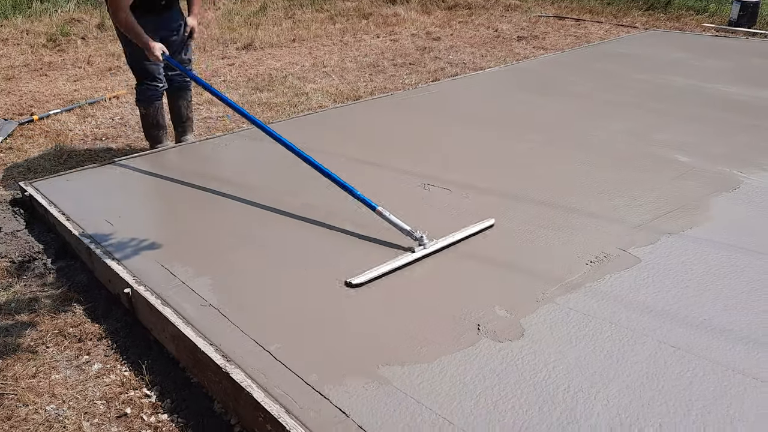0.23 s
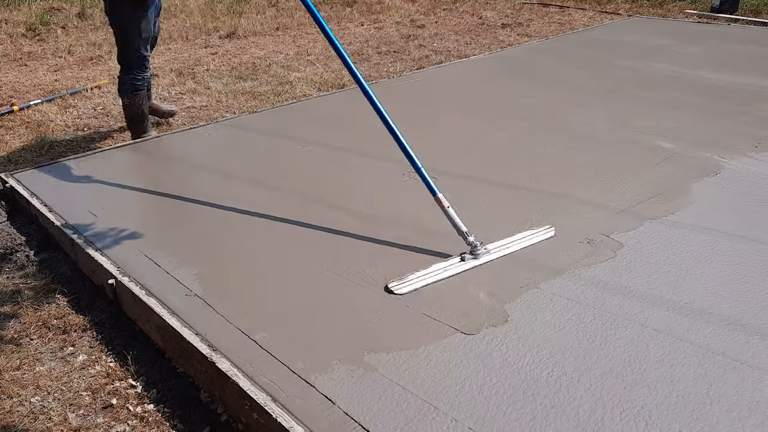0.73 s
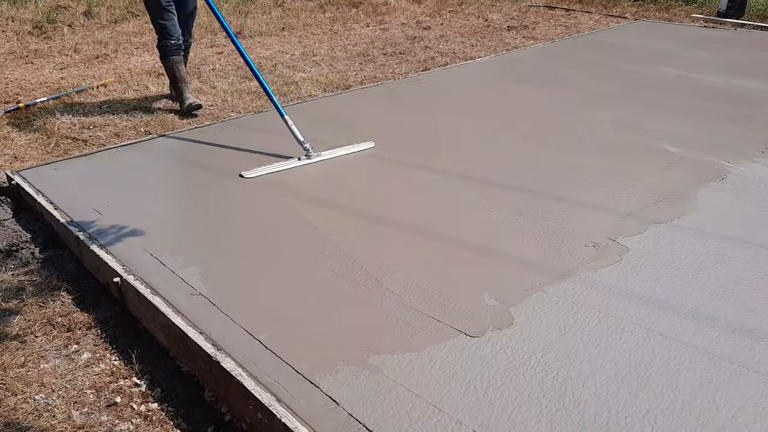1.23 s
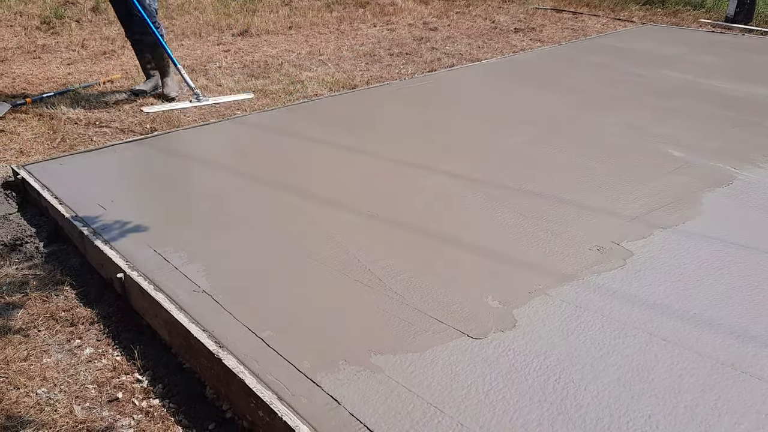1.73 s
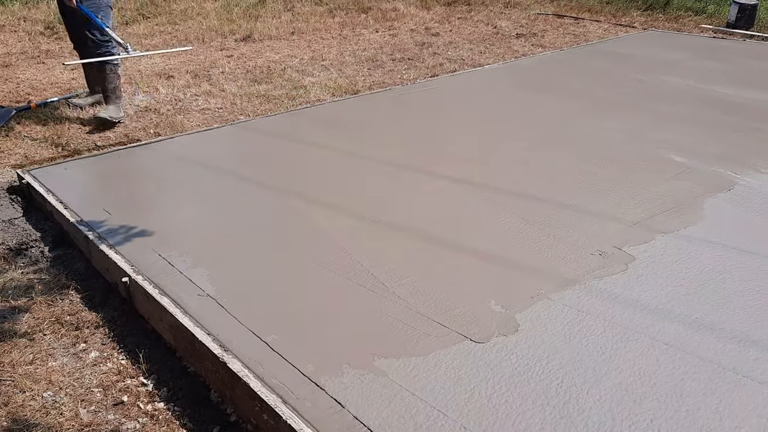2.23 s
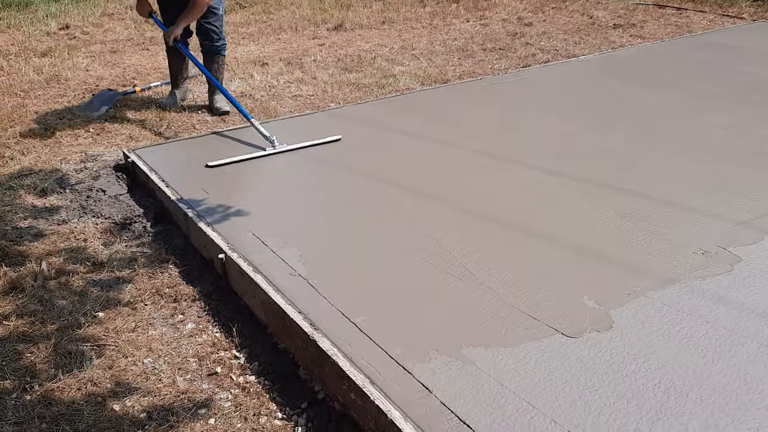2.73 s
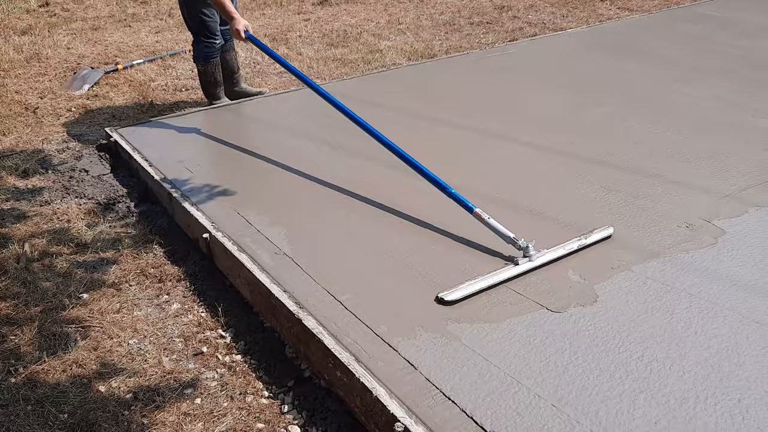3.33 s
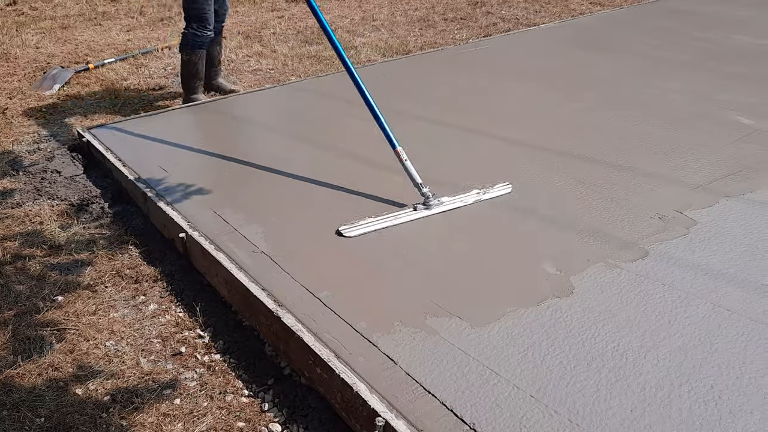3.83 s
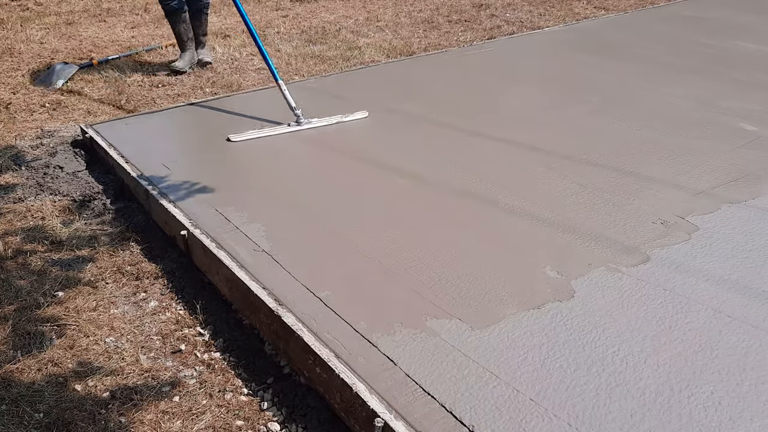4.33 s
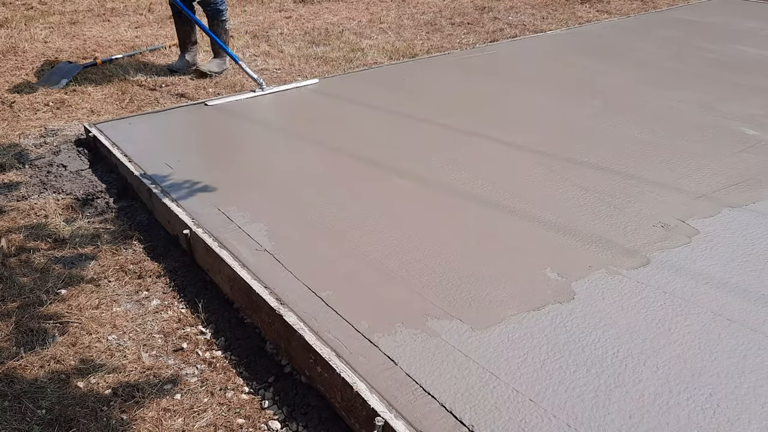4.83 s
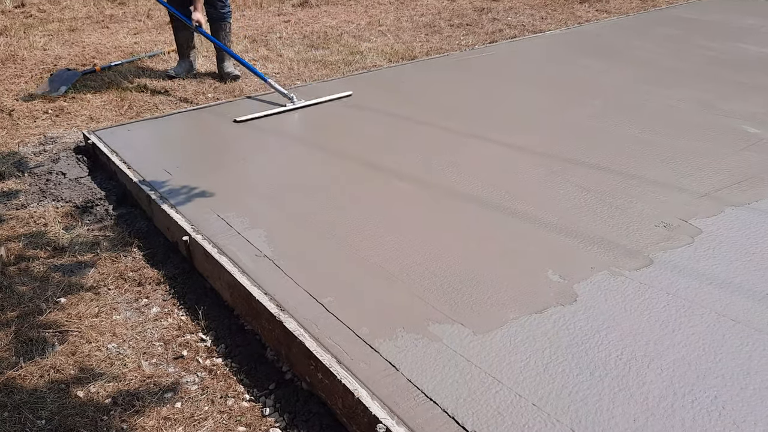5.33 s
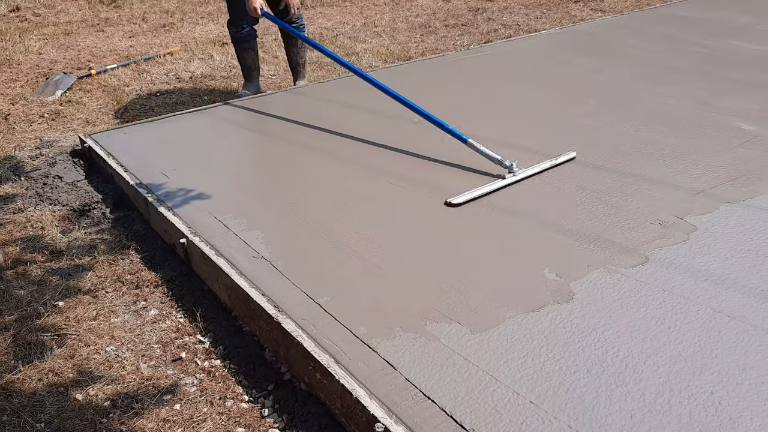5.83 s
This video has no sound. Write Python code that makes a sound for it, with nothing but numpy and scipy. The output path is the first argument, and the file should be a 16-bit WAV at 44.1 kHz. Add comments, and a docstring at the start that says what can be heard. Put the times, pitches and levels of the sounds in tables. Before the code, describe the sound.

A gritty metallic sweep over wet paste opens the scene, followed by a faint trailing scrape, a few ticks and a pause. A second, longer push builds and stops, the blade slides back, then a third push ends it. Open-air hiss and fine insect sizzle continue throughout. Low wind puffs hit the stereo microphone early, and a stronger gust arrives later on the right along with a brighter hiss.

```python
"""A metal bull float is pushed out over wet concrete at 0, 2.7 and 5.3 s: sand grains tick and ring
the blade, paste swishes and a water film hisses. Each is shaped noise, and so is the outdoor hiss.
Insects sizzle and wind rumbles throughout; eddies thump on the microphone ports as short low tones.
Between pushes the blade drags lightly back, twice, with scuffs and knocks made of short noise bursts.
One insect buzzes lower near 2.5 s; a brighter hiss sets in at 4.6 s, mostly on the right."""
import sys
import numpy as np
from scipy import signal
from scipy.fft import rfft, irfft, next_fast_len
from scipy.io import wavfile
from scipy.ndimage import uniform_filter1d, map_coordinates

SR = 44100
rng = np.random.default_rng(int(sys.argv[2]) if len(sys.argv) > 2 else 0)


def store_wav(level_fs):
    """Save 16-bit WAV to argv[1]."""
    pcm = np.round(np.clip(np.atleast_2d(level_fs), -1, 1) * 32767)
    wavfile.write(sys.argv[1], SR, pcm.T.astype(np.int16))


N = 268833  # length in samples, about 6.1 s


def amp(db):
    """Turn decibels into a gain."""
    return 10 ** (np.asarray(db) / 20)


def unit(x):
    """Scale to an average strength (rms) of 1."""
    return x / np.sqrt(np.mean(x ** 2) + 1e-20)


def seconds():
    """The time of every sample, in seconds."""
    return np.arange(N) / SR


def since(start):
    """Seconds since start, zero before it."""
    return np.maximum(seconds() - start, 0)


def held(start, end, attack, release):
    """Gain that rises until start, holds to end, then falls; attack and release are seconds per 20 dB."""
    t = seconds()
    before = np.maximum(start - t, 0)
    after = np.maximum(t - end, 0)
    return amp(-20 * (before / attack + after / release))


def approach(full, grows_db):
    """Gain that climbs by grows_db a second until the time full, as the blade comes nearer."""
    return amp(-grows_db * np.maximum(full - seconds(), 0))


def swells(rows):
    """Gain of bell-shaped swells (t/s, rise/s, fall/s, level/dB) whose powers add."""
    t = seconds()
    power = np.zeros(N)
    for peak, rise, fall, db in rows:
        distance = (t - peak) / np.where(t < peak, rise, fall)
        power += amp(db) ** 2 * np.exp(-np.minimum(distance ** 2, 100))
    return np.sqrt(power)


def wobble(rate):
    """A smooth curve through random points, rate points a second."""
    points = rng.standard_normal(int(N * rate / SR) + 4)
    return map_coordinates(points, [np.arange(N) * rate / SR])


def noise(alike=0):
    """White stereo noise whose sides share a part (alike) of their power."""
    own = rng.standard_normal((2, N))
    common = rng.standard_normal(N)
    return np.sqrt(1 - alike) * own + np.sqrt(alike) * common


def panned(x, right_db):
    """Lean a stereo sound to the right."""
    return x * amp([[-right_db / 2], [right_db / 2]])


def filtered(x, response):
    """Multiply the spectrum of x by a response of frequency."""
    size = x.shape[-1]
    m = next_fast_len(size + 8192)  # room for the filter's tail
    hz = np.fft.rfftfreq(m, 1 / SR)
    return irfft(rfft(x, m) * response(hz), m)[..., :size]


def coloured(x, spectrum, peaks=()):
    """Shape x by a spectrum (f/Hz, level/dB) and resonances (f/Hz, width/Hz, lift/dB), then set rms 1."""
    f, db = np.transpose(spectrum)

    def response(hz):
        level_db = np.interp(np.log(hz + 1), np.log(f), db)
        for centre, width, lift in peaks:
            level_db = level_db + lift / (1 + (2 * (hz - centre) / width) ** 2)
        return amp(level_db)

    return unit(filtered(x, response))


def patchy(x, depth_db):
    """Narrow bands of x swell and fade on their own."""
    bands = signal.stft(x, nperseg=1024)[2]
    field = rng.standard_normal(bands.shape[1:])
    field = uniform_filter1d(field, size=4, axis=0)  # smooth across pitch
    field = uniform_filter1d(field, size=6, axis=1)  # smooth across time
    return signal.istft(bands * amp(depth_db * unit(field)), nperseg=1024)[1][:, :N]


def grit(rate, size_db, share):
    """Ticks of very unequal size, rate a second, hold a share of the power; smooth noise holds the rest."""
    sizes = amp(size_db * np.minimum(rng.exponential(size=N), 4))
    hits = (rng.random(N) < rate / SR) * sizes
    burst = np.exp(-np.arange(SR // 200) / (SR * 0.0006))  # each tick's power dies in 0.6 ms
    power = np.abs(signal.fftconvolve(hits ** 2, burst)[:N])
    return noise(alike=0.096) * np.sqrt(1 - share + share * power / power.mean())


def pushes():
    """The blade rides out on the paste: sand rasps and rings it, paste swishes, a thin film hisses."""
    # forward strokes: set down t/s, full weight t/s, full ringing t/s, stop t/s, rasp level/dB,
    # rasp easing after full weight/(dB per s), paste level/dB, ring level/dB (rasp, paste boosted below)
    strokes = [(0, 0.337, 0.35, 0.53, -50.5, 20, -74.5, -46.5),
               (2.678, 3.19, 3.41, 3.47, -50, -4, -61, -47), (5.29, 5.655, 5.86, 6.05, -53, 3.5, -57, -49)]
    # wet patches that spray: t/s, rise/s, fall/s, level/dB (boosted below with the film)
    splashes = [(.172, 0.022, 0.015, -50.5), (.29, 0.062, 0.064, -53.5), (2.8, 0.067, 0.062, -52.5),
                (3.28, .13, .2, -55.5), (5.36, 0.026, 0.027, -58), (5.67, 0.066, .1, -48.5)]
    # colours of rasp, ringing, paste and spray: f/Hz, relative level/dB
    rasp_colour = [(250, -47), (680, -14), (900, -6.5), (1150, -1.5), (1450, -2), (2200, 2), (2700, -1),
                   (3300, -1), (4300, -3.5), (5300, -5), (7000, -14), (9000, -27), (16000, -37)]
    ring_colour = [(900, -27), (1170, -9), (1320, -27), (1520, -5), (1750, -18), (1980, -2), (2120, 0),
                   (2300, -0.5), (2500, -10), (3200, -9.5), (3900, -9.5), (4500, -18), (4900, -20),
                   (6000, -48)]
    paste_colour = [(60, -16), (130, -7), (230, -3.5), (330, -2.5), (420, -4.5), (600, 0.5), (720, -4.5),
                    (900, 0), (1300, -15.5), (2000, -18), (5000, -39)]
    spray_colour = [(2000, -16), (4000, 6.5), (5500, -0.5), (7300, 1), (8300, -5), (9300, -16),
                    (11500, -13), (20000, -28)]
    # resonances of the blade: f/Hz, width/Hz, lift over the rasp/dB
    blade = [(1150, 150, 1.5), (1600, 360, -3.5), (4600, 910, 5.5)]
    attack_s = 0.083  # the blade settles on the paste
    rasp_release_s, ring_release_s = 0.069, 0.094  # the blade slows and stops
    paste_release_s = 0.22  # the paste flows on a little

    rasp, paste, ringing = np.zeros((3, N))
    for start, full, rings, stop, rasp_db, easing_db, paste_db, ring_db in strokes:
        rasp_level = amp(rasp_db - easing_db * since(full)) * approach(full, grows_db=26.5)
        paste_level = amp(paste_db) * approach(full, grows_db=49)
        ring_level = amp(ring_db) * approach(rings, grows_db=57)
        rasp += rasp_level * held(start, stop, attack_s, rasp_release_s)
        paste += paste_level * held(start, stop, attack_s, paste_release_s)
        ringing += ring_level * held(start, stop, attack_s, ring_release_s)
    # the film follows the rasp's level, and the splashes add to it
    spray = np.hypot(amp(-10.5) * rasp, swells(splashes))

    grains = patchy(grit(rate=2000, size_db=7.5, share=0.32), depth_db=2.5)
    sand = rasp * amp(5) * coloured(grains, rasp_colour, blade)
    ringing_grains = patchy(grit(rate=810, size_db=5, share=0.27), depth_db=4)
    ring = ringing * coloured(ringing_grains, ring_colour)
    swish = paste * amp(3.5) * coloured(noise(alike=0.33), paste_colour)
    droplets = grit(rate=2500, size_db=5, share=0.35)
    film = spray * amp(3.5) * coloured(droplets, spray_colour)
    judder = amp(1.3 * wobble(35))  # the blade catches and frees itself
    return judder * (sand + panned(ring, right_db=-1.5) + swish + panned(film, right_db=3))


def outdoors():
    """Leaves hiss in the breeze over a far roar; a brighter hiss sets in, mostly on the right."""
    # level of the leaves: t/s, level/dB
    breeze_levels = [(0, -51), (.68, -54), (1.1, -51.5), (1.92, -53.5), (2.3, -51.5), (3.6, -52.5),
                     (4.1, -51.5), (6.1, -50)]
    # swells of a far, soft roar: t/s, rise/s, fall/s, level/dB
    far_swells = [(1.45, .4, 0.33, -65.5), (2.15, 0.21, 0.2, -66), (3.8, 0.44, .6, -64),
                  (5.4, 0.61, .45, -54)]
    # bright hiss at the left, then the right port: level/dB, fading/(dB per s)
    hiss_levels = [(-54, 6), (-45.5, 0.5)]
    # colours of leaves, roar and bright hiss: f/Hz, relative level/dB
    air_colour = [(100, -14), (240, -10), (310, -6), (420, -7.5), (620, -9), (860, -6.5), (1150, -14.5),
                  (1900, -15.5), (2600, -9), (3600, -3), (5000, -0.5), (6100, -4.5), (7400, -5),
                  (9200, -20.5), (11000, -16.5), (20000, -7.5)]
    roar_colour = [(200, -51), (430, -10.5), (590, 1.5), (720, -1), (880, 4), (1100, -1.5), (1400, -2),
                   (2000, -16), (4000, -79)]
    bright_colour = [(1500, -17.5), (2800, -15), (3800, -4), (4600, -0.5), (5250, 4.5), (5600, -1.5),
                     (7000, -3), (8000, -9.5), (9200, -26), (12000, -30), (20000, -32)]
    hiss_start_s, hiss_attack_s = 4.58, 0.03

    breeze = amp(np.interp(seconds(), *np.transpose(breeze_levels)))
    leaves = breeze * coloured(patchy(noise(), depth_db=2.5), air_colour)
    roar = swells(far_swells) * coloured(patchy(noise(), depth_db=1.5), roar_colour)
    fading = np.array([amp(db - fade_db * since(hiss_start_s)) for db, fade_db in hiss_levels])
    onset = held(hiss_start_s, N / SR, hiss_attack_s, 1)
    hiss = onset * fading * coloured(noise(), bright_colour)
    return panned(leaves, right_db=1.5) + roar + hiss


def insects():
    """Insects sizzle in swells of high noise in the grass; one buzzes in a lower band for a moment."""
    # swells of the sizzle: t/s, rise/s, fall/s, level/dB
    sizzling = [(.25, .4, 0.4, -60.5), (1.1, 0.21, .23, -57), (2.31, 0.11, 0.11, -59),
                (2.75, 0.19, .15, -56), (3.04, .15, 0.15, -54), (4.02, .09, 0.21, -57),
                (4.3, .15, 0.14, -67), (4.75, 0.15, 0.23, -54.5), (5.14, .22, .06, -53.5),
                (5.6, 0.42, .3, -58)]
    # the one buzz: start t/s, end t/s, attack/s, release/s, level/dB
    start, end, attack, release, buzz_db = (2.3, 2.77, .3, .12, -60)
    # colours of sizzle and buzz: f/Hz, relative level/dB
    sizzle_colour = [(9000, -35), (11300, -12), (12600, -1), (14500, 0), (16000, -5)]
    buzz_colour = [(6000, -47), (7200, -20), (7450, 1), (7800, -5), (8150, -14), (9000, -54)]

    chorus = np.hypot(amp(-67.5), swells(sizzling))  # a soft bed remains between swells
    sizzle = chorus * amp(1.1 * wobble(40)) * coloured(noise(), sizzle_colour)
    buzz_level = held(start, end, attack, release) * amp(buzz_db + 1.1 * wobble(70))
    buzz = buzz_level * coloured(patchy(noise(), depth_db=1), buzz_colour)
    return panned(sizzle + buzz, right_db=2)


def wind():
    """Gusts rumble at each port; single eddies thump against them with a hollow puff."""
    # gusts: start t/s, end t/s, release/s, rumble level/dB (boosted below), hollow murmur level/dB
    gusts = [(0.06, .5, 0.31, -54.5, -63), (0.86, 1.2, 0.79, -61, -74), (3.155, 3.41, 0.089, -63, -76),
             (4.015, 4.5, .2, -64.5, -78.5), (4.591, 4.832, 0.45, -44.5, -63), (5.27, 6.1, .3, -57, -63)]
    # single eddies: t/s, left level/dB, right level/dB, f/Hz, length/s,
    # hollow puff over the thump/dB (lowered below)
    buffets = [(.173, -43, -46, 81, .018, -3), (0.596, -39, -41.5, 80, 0.016, -6.5),
               (0.656, -41, -54, 72, 0.038, -10), (0.823, -33.5, -35, 101, .014, -8.5),
               (0.949, -48, -50, 105, 0.0088, -2), (1.032, -40.5, -42, 88, .0084, -11),
               (1.177, -47, -51, 72, 0.018, -12), (1.295, -49, -51, 110, 0.0061, .5),
               (3.283, -52, -51, 100, .012, -15), (3.384, -51, -50, 95, .025, -15),
               (4.602, -42, -34, 75, 0.03, -29), (4.667, -55, -29.5, 68, 0.024, -18),
               (4.747, -53, -26, 99, 0.0095, -25), (4.78, -46, -30, 72, .022, -22),
               (4.83, -51, -32.5, 65, 0.018, -18), (4.901, -50, -30, 66, 0.014, -16),
               (4.949, -44, -31.5, 60, 0.015, -21), (5.036, -54, -37.5, 76, 0.014, -17),
               (5.155, -55, -34.5, 61, .007, -16.5), (5.55, -68, -39, 64, 0.022, -12)]
    # colours of the rumble and of the ports' hollow: f/Hz, relative level/dB
    rumble_colour = [(15, -49), (30, -15), (45, -6.5), (62, -1), (90, -1), (125, -1.5), (170, -10),
                     (240, -20), (330, -21.5), (480, -64), (1200, -68)]
    port_colour = [(60, -10), (140, 8), (235, -2), (320, 3), (420, -12), (650, -19), (1500, -60)]

    rumble = np.full(N, amp(-67.5))  # a faint rumble stays between gusts
    hollow = np.zeros(N)
    for start, end, release, rumble_db, hollow_db in gusts:
        gust = held(start, end, 0.09, release)
        rumble = np.hypot(rumble, amp(rumble_db) * gust)
        hollow = np.hypot(hollow, amp(hollow_db) * gust)
    lumps = unit(amp(3.7 * np.array([wobble(26), wobble(26)])))  # uneven at each port on its own
    flow = rumble * amp(2) * coloured(noise(alike=0.15), rumble_colour)
    flutter = unit(amp(3.2 * wobble(20)))
    murmur = hollow * flutter * panned(coloured(noise(), port_colour), right_db=4)
    out = lumps * (flow + murmur)

    puff = panned(coloured(noise(), port_colour), right_db=6.5)
    t = seconds()
    for s, left_db, right_db, hz, length, puff_db in buffets:
        near = np.abs(t - s) < 4 * length
        u = t[near] - s
        turn = rng.random()
        port_turns = rng.random((2, 1))
        swing = np.sin(2 * np.pi * (hz * u + turn + 0.5 * port_turns))  # the ports swing out of step
        thump = swing + amp(puff_db - 4) * puff[:, near]
        out[:, near] += amp([[left_db], [right_db]]) * thump * np.exp(-(u / length) ** 2)
    return out


def skims():
    """With little weight on it, the blade drags lightly and unevenly."""
    # light contacts, trailing or just set down: start t/s, end t/s, drag level/dB (boosted below)
    contacts = [(.08, 0.173, -56), (0.73, .8, -67), (.82, 0.88, -57.5), (0.944, 1.24, -57),
                (1.355, 1.636, -58), (1.697, 1.78, -59), (2.678, 3.2, -54), (3.705, 4.544, -58.5),
                (3.83, 4.009, -60.5), (4.602, 4.663, -52), (4.7, 4.95, -61), (5.328, 5.545, -55.5)]
    # colour of the drag: f/Hz, relative level/dB
    drag_colour = [(250, -18), (700, -36), (1000, -6.5), (1220, 1.5), (1400, -2), (1620, -3.5),
                   (1920, -6.5), (2450, -0.5), (2900, -7.5), (3700, -2.5), (4800, -4), (6500, -23),
                   (9000, -26.5)]
    attack_s, release_s = 0.079, 0.076

    levels = [amp(db) * held(start, end, attack_s, release_s) for start, end, db in contacts]
    drag = np.linalg.norm(levels, axis=0)  # their powers add
    grains = patchy(grit(rate=1200, size_db=4.5, share=0.39), depth_db=2.5)
    uneven = amp(3 + 1.7 * wobble(28.02))  # a 3 dB boost that wavers
    return panned(drag * uneven * coloured(grains, drag_colour), right_db=-0.5)


def scuffs():
    """The tool catches or knocks: short noise bursts in a broad band around one pitch."""
    # small scuffs and knocks: t/s, peak level/dB, centre f/Hz, time to die by 60 dB/s
    knocks = [(0.163, -46, 4500, .05), (.385, -33.5, 4000, 0.16), (.536, -36, 2500, 0.1),
              (.556, -34, 2480, .08), (1.772, -41, 1480, 0.08), (1.91, -44, 925, 0.058),
              (2.115, -53, 1300, .13), (2.808, -34.5, 1490, .04), (3.409, -33.5, 2400, .035),
              (3.5, -41, 2100, 0.16), (3.82, -39, 3600, .05), (3.858, -38, 3800, .06),
              (3.965, -37, 3830, 0.32), (4.17, -41.5, 3800, 0.15), (4.611, -37, 2100, 0.15),
              (5.364, -41, 3010, .04), (5.933, -40, 1510, .017), (5.962, -32, 2070, 0.019)]
    out = np.zeros((2, N + SR))  # spare room for the last burst
    t = np.arange(SR // 4) / SR
    for s, db, centre_hz, t60 in knocks:
        def band(hz):
            resonance = 1 / (1 + 1.8j * (hz / centre_hz - centre_hz / (hz + 1)))
            return resonance / (1 + (hz / 7000) ** 4)  # softer above 7 kHz

        envelope = amp(-60 * t / t60) * (1 - np.exp(-t / 0.0024))
        burst = filtered(rng.standard_normal((2, len(t))) * envelope, band)
        first = round(s * SR)
        out[:, first:first + len(t)] += amp(db) * burst / np.abs(burst).max()
    return out[:, :N]


def scene():
    """The float at work in the open air."""
    return pushes() + outdoors() + insects() + wind() + skims() + scuffs()


def record(dry):
    """Each microphone port has its own treble; nothing is kept from the band limit upward."""
    # how the two ports differ in the treble: f/Hz, left over right level/dB
    port_tilt = [(7000, 0), (9500, 5.5), (11500, 3), (13500, 0)]
    top_hz = 15750

    def response(hz):
        left_over_right_db = np.interp(hz, *np.transpose(port_tilt))
        return amp(left_over_right_db * np.array([[0.5], [-0.5]])) * (hz < top_hz)

    return filtered(dry, response)


dry = scene()
out = record(dry)
store_wav(out)
```